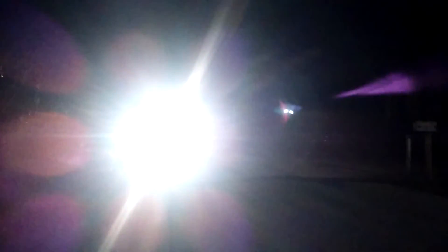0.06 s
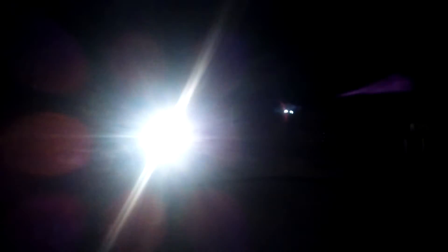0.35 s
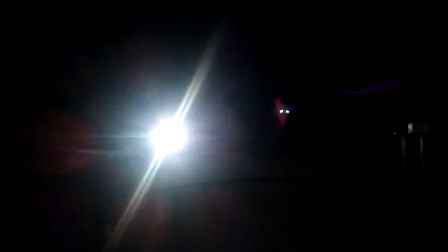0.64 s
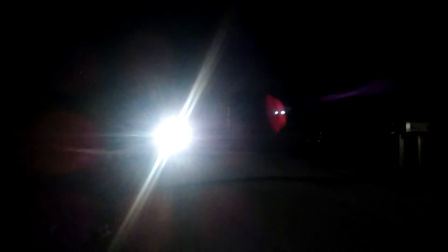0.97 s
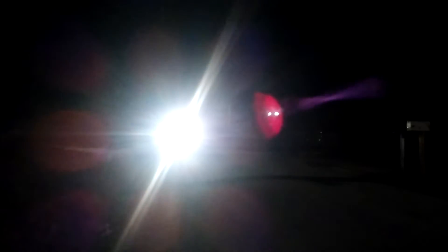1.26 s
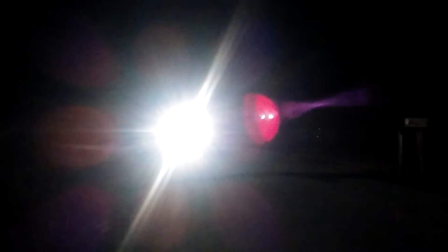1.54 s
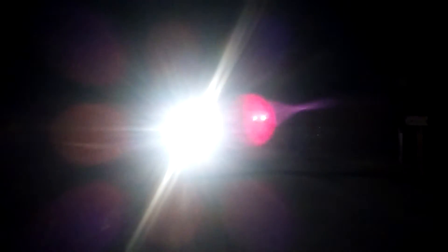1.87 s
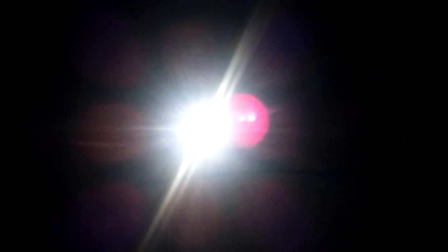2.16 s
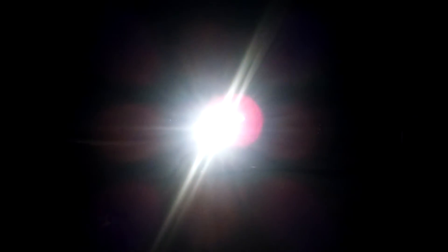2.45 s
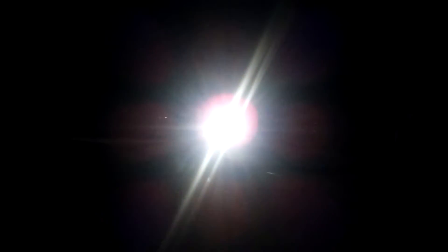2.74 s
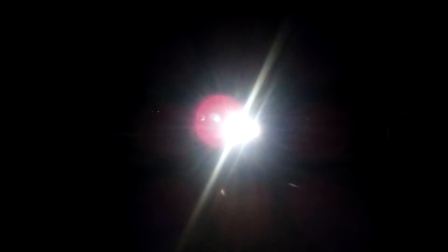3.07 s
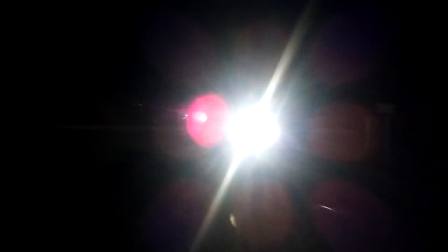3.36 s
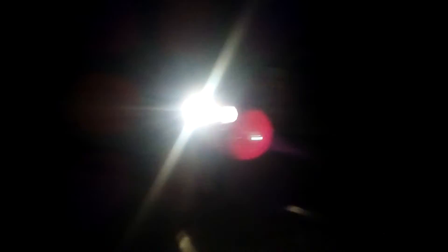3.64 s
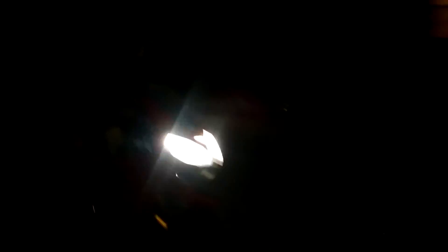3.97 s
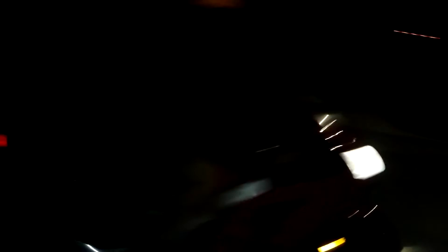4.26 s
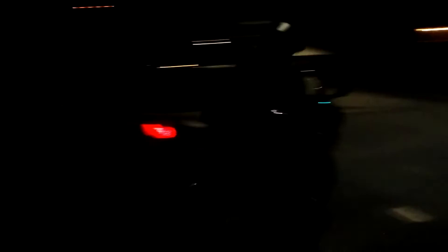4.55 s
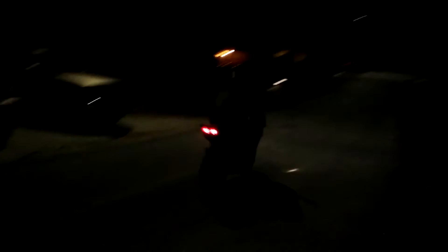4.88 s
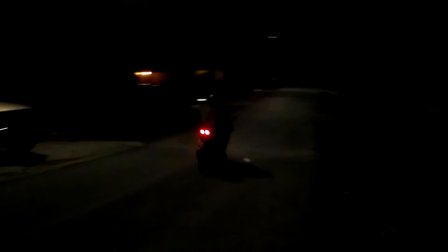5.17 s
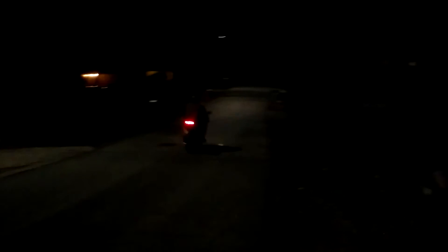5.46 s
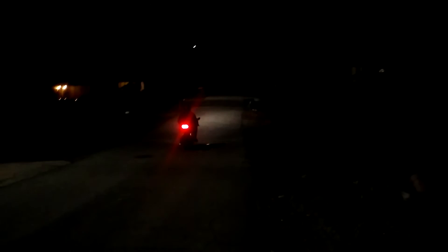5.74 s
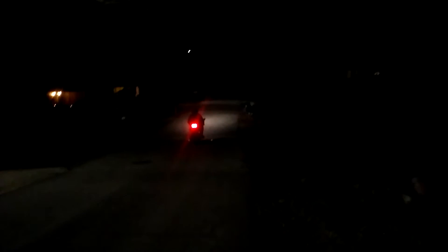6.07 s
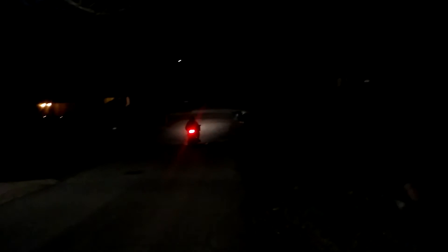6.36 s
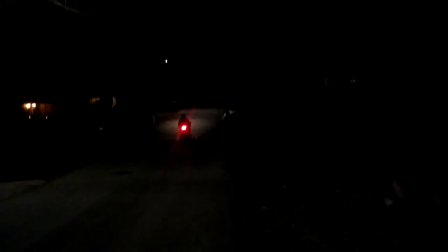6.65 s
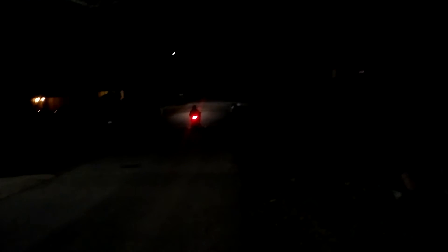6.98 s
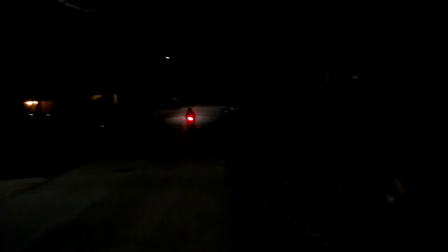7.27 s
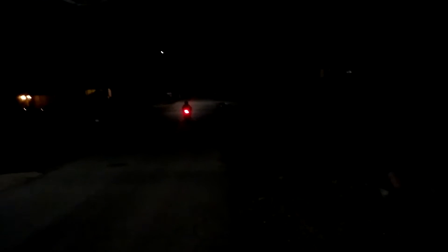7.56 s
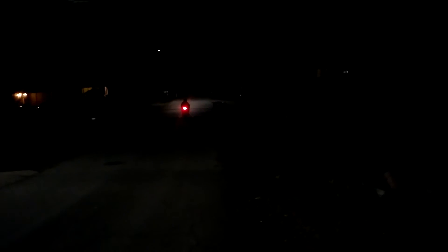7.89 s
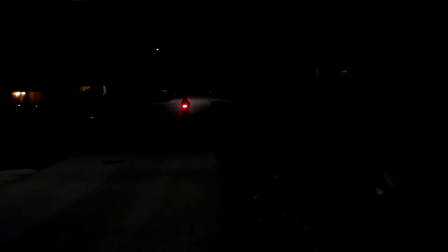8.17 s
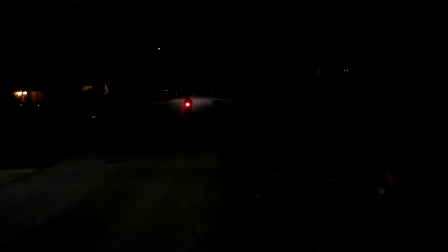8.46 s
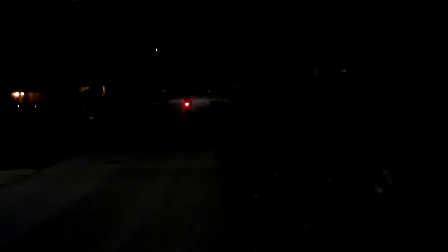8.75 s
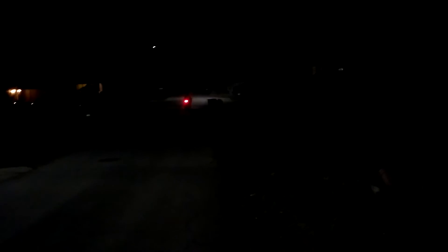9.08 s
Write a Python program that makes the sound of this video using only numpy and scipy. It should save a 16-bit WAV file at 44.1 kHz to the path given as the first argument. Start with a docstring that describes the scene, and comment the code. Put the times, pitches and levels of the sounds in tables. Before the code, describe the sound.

On a hushed night street, a motorcycle drones closer, accelerates loudly past, then eases off and idles far away.

```python
"""A quiet street at night: a motorcycle approaches, opens the throttle, passes close by and drops to a
distant idle. Each firing sends a pressure pulse down the exhaust. At light load the pulses excite the
silencer's resonances as uneven putts; under power they merge into a harmonic drone and a bright bark.
House fronts reflect the sound. Clatter, hiss and the whine of gears and chain swell around the pass,
and a few small clicks and rustles sound nearby."""
import sys
import numpy as np
from scipy import signal
from scipy.fft import rfft, irfft, next_fast_len
from scipy.io import wavfile
from scipy.ndimage import uniform_filter1d

SR = 44100
rng = np.random.default_rng(int(sys.argv[2]) if len(sys.argv) > 2 else 0)


def bounce(signal):
    """Save signal as a 16-bit WAV file at the path given by the first command-line argument."""
    frames = np.transpose(np.atleast_2d(signal))
    limited = np.clip(frames, -1, 1)
    pcm = np.round(limited * 32767).astype(np.int16)
    wavfile.write(sys.argv[1], SR, pcm)


N = 406592
TIME = np.arange(N) / SR
PASS_S, NEAR_SPAN_S = 4.5, 0.48  # the bike is alongside, and counts as near this long either side


def from_db(db):
    """Decibel law: amplitude grows tenfold every 20 dB."""
    return 10 ** (np.asarray(db) / 20)


def rms_one(x):
    """Normalisation to unit mean power."""
    return x / np.sqrt(np.mean(x ** 2) + 1e-20)


def levelled(x, size=6000):
    """Division by the running RMS gives unit local power and keeps the fast beat."""
    return x / np.sqrt(np.abs(uniform_filter1d(uniform_filter1d(x ** 2, size), size)) + 1e-14)


def blend(tone, rough, tone_share):
    """Incoherent addition: the powers of a pitched and a noisy sound sum to a constant."""
    share = np.clip(tone_share, 0, 1)
    return np.sqrt(share) * levelled(tone) + np.sqrt(1 - share) * levelled(rough)


def bump(centre_s, span_s):
    """Gaussian envelope of height 1, down to 1/e at span_s either side."""
    return np.exp(-((TIME - centre_s) / span_s) ** 2)


def in_time(curve):
    """Linear interpolation of a curve at every sample."""
    return np.interp(TIME, *np.transpose(curve))


def at_hz(spectrum, hz):
    """Interpolation of a spectrum's decibels over log frequency."""
    known_hz, db = np.transpose(spectrum)
    return np.interp(np.log(hz), np.log(known_hz), db)


def coloured(x, spectrum):
    """Minimum-phase filtering: folding the cepstrum makes the response causal."""
    size = next_fast_len(N + 8192, real=True)
    hz = np.arange(size // 2 + 1) * SR / size + 1
    cepstrum = irfft(np.log(from_db(at_hz(spectrum, hz))), size)
    cepstrum[1:size // 2] *= 2
    cepstrum[size // 2 + 1:] = 0
    return irfft(rfft(x, size) * np.exp(rfft(cepstrum)), size)[:N]


def band(x, low_hz, high_hz, order=4):
    """Butterworth band-pass filtering."""
    edges = np.clip([low_hz, high_hz], 10, .45 * SR)
    return signal.sosfilt(signal.butter(order, edges, "band", fs=SR, output="sos"), x + 1e-18)


def resonate(x, modes):
    """Modal superposition: one force drives parallel damped resonators."""
    return sum(from_db(db) * signal.lfilter(*signal.iirpeak(hz, hz / width, fs=SR), x)
               for hz, width, db in modes)


def drift(per_s):
    """Random fluctuation: straight lines between Gaussian values."""
    knots = rng.standard_normal(4000)
    return np.interp(TIME * per_s, np.arange(len(knots)), knots)


def noise():
    """White noise: equal power per hertz."""
    return rng.standard_normal(N)


# Spectrum of the street's hush: frequency_hz, gain_db
STREET_SPECTRUM = [(20, -23), (50, -5.5), (120, 6.5), (330, -3), (470, -16), (680, -12.5), (930, -3),
                   (1300, -16), (1700, -23.5), (2800, -15), (3600, -29), (6500, -31), (10000, -40),
                   (15000, -33.5)]

def street(level_db=-62.5):
    """Ambient noise floor: a steady hush, strongest in the bass."""
    return from_db(level_db) * rms_one(coloured(noise(), STREET_SPECTRUM))


# Engine speed as heard: time_s, firing_rate_hz
FIRING_RATE = [(0, 69.5), (.35, 71.2), (.8, 70.9), (1.7, 75.6), (2, 76.2), (2.75, 78.8), (2.88, 84.4),
               (3.05, 72), (3.24, 94.5), (3.35, 89), (3.5, 94.5), (3.64, 103), (4.2, 128.2), (4.27, 135.8),
               (4.38, 163.8), (4.46, 175.5), (4.56, 177.2), (4.7, 190.8), (4.85, 200.2), (4.98, 203.7),
               (5.17, 192.5), (5.24, 164.5), (5.35, 161.4), (5.75, 111.3), (6.03, 90.5), (6.5, 60.4),
               (6.85, 50.6), (9.22, 52.2)]
# Throttle, with a blip and a long pull before it shuts: time_s, load_fraction
ENGINE_LOAD = [(0, 0.34), (2.78, 0), (2.88, 0.15), (3.05, 0.53), (3.22, 0.47), (3.8, 0.55), (4.5, 0.68),
               (5.0, 0.72), (5.15, 0.92), (5.21, 0.11)]

def combustion(rate, load, wobble=0.001, burble_cycles=0.091, limp_db=-0.24,
               idle_hz=51, idle_spread_db=5.0, overrun_spread_db=1.0, least_spread_db=0.9):
    """Cyclic variation: firings even out as the revs rise, and burble early and late on the overrun."""
    overrun = np.exp(-((TIME - 5.75) / 0.57) ** 4)
    cycles = np.cumsum(rate * (1 + wobble * drift(70))) / SR
    stumbling = cycles + burble_cycles * overrun * drift(60)
    firing = np.round(stumbling).astype(int)
    chance = np.clip(rng.standard_normal(2000), -2, 2)
    spread_db = idle_spread_db * (idle_hz / rate) ** 2.8 + overrun_spread_db * overrun + least_spread_db
    imbalance_db = limp_db * (-1) ** firing  # two unequal cylinders add faint half orders
    strength = uniform_filter1d(from_db(spread_db * chance[firing] + imbalance_db), size=100)
    tonal = np.clip(0.16 * (1 - overrun) + 0.79 * load, 0, 1)
    return cycles, stumbling, strength, tonal


# Overall course of the exhaust at the roadside: time_s, level_db
EXHAUST_LEVEL = [(0.0, -36), (0.49, -34.5), (0.96, -35), (1.88, -31.5), (2.42, -31), (2.64, -29.5),
                 (3.13, -26), (3.17, -20), (3.56, -19), (4.37, -8.5), (4.68, -9.5), (4.84, -7), (5.04, -10),
                 (5.32, -20), (5.57, -25.5), (6.13, -44), (6.82, -53.5), (7.7, -54.5)]
# Course of its middle orders, the bark: time_s, level_db
BARK_LEVEL = [(0, -47), (1, -45), (2.7, -44), (3.1, -40), (3.3, -36.5), (3.7, -32), (4.05, -25),
              (4.35, -17.5), (4.75, -15.5), (5.1, -25), (5.22, -35.5), (5.8, -45), (6.35, -47.5),
              (6.75, -54), (7, -62), (7.8, -63.5), (8.2, -69.5), (9.22, -69)]
# Runs of stronger firings with the throttle shut: centre_s, lift_db
SPUTTER_RUNS = [(5.58, 0), (5.87, -2), (6.17, 3), (6.34, 4), (7.2, 3), (7.84, 1), (8.02, 5), (8.18, 10.5),
                (8.32, 8.5), (8.611, 4.5), (8.78, 1), (8.93, 4), (9.09, 5.5)]

def exhaust_gains(rate, load, sputter_span_s=0.029, idle_hz=51):
    """Source balance: revs and load favour drone over putts; sputters lift both, and the bark less."""
    lift_db = sum(db * bump(s, sputter_span_s) for s, db in SPUTTER_RUNS)
    exhaust_db = in_time(EXHAUST_LEVEL) + lift_db
    drone_db = exhaust_db - 2 + 2 * load
    putt_db = exhaust_db - 1 - 15 * load ** 2 - 3 * np.log2(rate / idle_hz)
    bark_db = in_time(BARK_LEVEL) + lift_db / 2 - 0.5
    return from_db(drone_db), from_db(putt_db), from_db(bark_db)


# Spectral envelopes of the exhaust coming, alongside and going: frequency_hz, gain_db
EXHAUST_COMING = [(70, -7.5), (85, -10), (110, -2), (140, -4.5), (175, -12), (230, -7.5), (285, -6),
                  (340, -9.5), (385, -8), (440, -24.5), (520, -13.5)]
EXHAUST_NEAR = [(135, -2), (175, -5), (197, 1), (240, 0.5), (288, -23), (320, -3), (352, 2), (390, -8),
                (430, -0.5), (500, -4), (560, -13), (605, -30), (740, -10.5), (810, -11)]
EXHAUST_GOING = [(50, -17), (75, -7), (103, -2), (130, -2), (165, -10.5), (205, -4), (240, -11),
                 (280, -3.5), (330, -3.5), (400, -12.5), (600, -29.5)]
# Swells and fades of single harmonics: centre_s, span_s, harmonic_number, gain_db
HARMONIC_SWELLS = [(.1, 0.12, 2, -9), (.55, 0.3, 3, 4), (1.852, 0.33, 1, -21), (1.9, 0.28, 2, 7),
                   (2.357, 0.11, 3, -12), (2.7, 0.33, 1, 3), (5.62, .08, 1, 4), (5.753, .15, 2, -2),
                   (5.884, .06, 1, 11), (6.3, .35, 1, -4.5), (6.35, .35, 2, -10), (6.043, 0.088, 4, 8),
                   (4.335, 0.029, 2, 2), (4.603, 0.093, 4, 4.5), (7.0, .35, 1, 11), (5.137, 0.054, 2, 7.5)]

def drone(cycles, strength, rate, near_from_s=4.2, near_until_s=5.17, fade_s=0.15, waver_db=2.5):
    """Harmonic series: four orders of the firing rate glide through the exhaust's peaks and dips."""
    near = np.clip(np.minimum(TIME - near_from_s, near_until_s - TIME) / fade_s + .5, 0, 1)
    far = 1 - bump(PASS_S, 2 * NEAR_SPAN_S)
    out = 0
    for k in range(1, 5):
        hz = k * rate
        far_db = np.where(TIME < PASS_S, at_hz(EXHAUST_COMING, hz), at_hz(EXHAUST_GOING, hz))
        colour_db = near * at_hz(EXHAUST_NEAR, hz) + (1 - near) * far_db
        swell_db = sum(db * bump(s, span) for s, span, order, db in HARMONIC_SWELLS if round(order) == k)
        gain = from_db(colour_db + swell_db + waver_db * far * drift(9))
        flutter = levelled(strength ** (k / 3))
        lag_rad = 0.31 * (hz / 105) ** 1.5  # dispersion: the pipe delays higher frequencies more
        out = out + gain * flutter * np.cos(2 * np.pi * k * cycles - lag_rad)
    return band(np.sqrt(2) * out, 42, 2000)


def wall_echo(x, echo_db=-6, span_s=2.2, shortest_m=4.34, nearest_s=4.4, growth_m_per_s=2.65):
    """Interference: a reflection's path changes as the bike moves, so each harmonic swells and fades."""
    extra_path_m = shortest_m + growth_m_per_s * np.abs(TIME - nearest_s)
    reflection = np.interp(TIME - extra_path_m / 343, TIME, x)
    gain = from_db(echo_db) * (1 - bump(PASS_S, span_s))  # the direct sound swamps it close by
    return (x + gain * reflection) / np.sqrt(1 + gain ** 2)


def pulses(cycles, strength):
    """Impulse train: one pulse per firing, shared between two neighbouring samples."""
    at = np.flatnonzero(np.diff(np.floor(cycles)) > 0)
    late = (np.ceil(cycles[at]) - cycles[at]) / (cycles[at + 1] - cycles[at])
    out = np.zeros(N)
    out[at], out[at + 1] = strength[at] * (1 - late), strength[at] * late
    return out


# Resonances of the silencer: pitch_hz, bandwidth_hz, gain_db
SILENCER_MODES = [(119, 43, 0.5), (247, 90, 4), (354, 86, -8.5)]

def putts(firings, cycles, tonal, turbulence=0.67, puff_depth=0.99):
    """Forced resonance: each pulse and its puff of turbulent gas thump the silencer's broad modes."""
    puffs = noise() * (1 + puff_depth * np.cos(2 * np.pi * cycles))
    puff_share = np.clip(turbulence * (1 - tonal), 0, 1)
    gas = np.sqrt(1 - puff_share) * levelled(firings) + np.sqrt(puff_share) * rms_one(puffs)
    thumps = band(resonate(gas, SILENCER_MODES), 75, 410, order=7)
    return levelled(street_scatter(thumps))


def street_scatter(x, riding_db=-1, idle_db=-13, decay_s=0.22, size=16000):
    """Diffuse reflection: walls, fences and parked cars return a short tail of echoes."""
    echo_db = np.interp(TIME, [6.3, 7.5], [riding_db, idle_db])
    tail = rng.standard_normal(size) * np.exp(-np.arange(size) / SR / decay_s)
    return x + from_db(echo_db) * signal.fftconvolve(x, tail / np.linalg.norm(tail))[:N]


# Spectra of the bike's noise coming, alongside and going: frequency_hz, gain_db
NOISE_COMING = [(400, -1), (580, -5), (740, 0.5), (900, -4), (1400, -7.5), (1750, -4.5), (2300, -6.5),
                (3100, -9), (3800, -20), (4700, -20.5), (6800, -20.5), (8500, -29.5), (11000, -32.5),
                (15000, -39)]
NOISE_NEAR = [(400, -2.5), (700, 2), (1000, 8.5), (1300, -3), (1900, 0), (2500, -2.5), (3300, -7.5),
              (4500, -13.5), (6600, -12), (8000, -19.5), (10000, -24), (12500, -28), (15500, -32.5)]
NOISE_GOING = [(400, -1), (490, -8.5), (660, 6), (900, -1), (1300, -13), (1650, -4.5), (2800, -8.5),
               (3500, -19), (4400, -19.5), (5300, -21.5), (6200, -14), (8300, -27), (10500, -31),
               (15000, -44)]

def rush(cycles, strength, throb=0.024, near_s=4.533, span_s=1.0, grain_db=1.6):
    """Directivity: the noise of gas, valve gear, chain and tyres changes colour as the bike goes by."""
    near = bump(near_s, span_s)
    views = [(NOISE_COMING, (1 - near) * (TIME < near_s)),
             (NOISE_NEAR, near),
             (NOISE_GOING, (1 - near) * (TIME >= near_s))]
    sound = sum(np.sqrt(share) * rms_one(coloured(noise(), spectrum)) for spectrum, share in views)
    beat = 1 + throb * np.cos(2 * np.pi * cycles) * np.sqrt(strength)
    return sound * beat * from_db(grain_db * drift(300))


# Spectral envelope of the exhaust's bark: frequency_hz, gain_db
BARK_SPECTRUM = [(400, -20.5), (500, -13), (600, -8.5), (760, -2), (1000, 4), (1400, -1), (1750, -16.5),
                 (2400, -18), (4000, -26.5), (8000, -49)]

def bark(firings, rushing, rate, tonal, knee_hz=880, full_rate_hz=170):
    """Wave steepening: pulses sharpen with the revs, so the middle orders grow brighter."""
    harmonics = band(coloured(firings, BARK_SPECTRUM), 560, 5000)
    sound = blend(harmonics, band(rushing, 480, 1400), tonal)
    steepness = np.clip(rate / full_rate_hz, .5, 1.2)
    return levelled(band(sound, 230, knee_hz, order=2) + steepness * band(sound, knee_hz, 5100, order=1))


# Course of the engine's mechanical noise at the roadside: time_s, level_db
MACHINERY_LEVEL = [(0, -55.5), (1.3, -51), (2.7, -44), (2.88, -39), (3.08, -40.5), (3.25, -34),
                   (3.55, -32.5), (4.3, -21.5), (4.75, -22), (5.15, -25), (5.25, -29.5), (5.9, -41.5),
                   (6.35, -48.5), (6.85, -57.5), (7.6, -60.5), (8.1, -68.5), (9.22, -73.5)]

def machinery(firings, rushing, tonal, snarl=0.42):
    """Broadband radiation: clatter and hiss follow one level, and the treble opens up close by."""
    clatter = blend(band(firings, 1350, 1956), band(rushing, 1313, 3950), snarl * tonal ** 3)
    hiss = levelled(band(casing(rushing), 4040, 9000))
    treble = levelled(band(rushing, 9000, 17000))
    behind = np.clip((TIME - PASS_S) / NEAR_SPAN_S, 0, 1)
    hiss_db = -8 + 3.5 * bump(4.56, .9) - 1.5 * behind
    treble_db = -22 + 7 * bump(4.38, 0.24)
    sound = from_db(-1.16) * clatter + from_db(hiss_db) * hiss + from_db(treble_db) * treble
    return from_db(in_time(MACHINERY_LEVEL)) * sound


# Resonances of the engine casings and chain guard: pitch_hz, bandwidth_hz, gain_db
CASING_MODES = [(4540, 730, 0), (5700, 500, -17.5)]

def casing(x, behind_s=4.7, fade_s=0.4):
    """Panel resonance: metal covers colour the noise once the bike shows its side and back."""
    exposed = np.clip((TIME - behind_s) / fade_s + .5, 0, 1)
    return x + exposed * resonate(x, CASING_MODES)


# Soft rustles nearby: centre_s, span_s, level_db
RUSTLE_SWELLS = [(0.941, .03, -55), (2.227, 0.017, -49), (6.654, .06, -61), (6.937, .04, -61),
                 (7.23, .04, -66), (7.62, .025, -59), (7.75, 0.027, -68), (7.868, .02, -65),
                 (8.873, .025, -70)]

def rustles(grain_db=5):
    """Random amplitude modulation makes brief swells of hiss grainy."""
    envelope = sum(from_db(db) * bump(s, span) for s, span, db in RUSTLE_SWELLS)
    return envelope * rms_one(band(noise(), 5400, 8300, order=2) * from_db(grain_db * drift(200)))


# Tones of the gears: firing_rate_multiple, centre_s, span_s, level_db, linewidth_hz
GEAR_TONES = [(22.5, 2.15, .75, -48.5, 220), (62, 2.15, .3, -59, 150), (25, 2.87, .05, -42, 1100),
              (44, 2.95, .08, -50, 130), (44, 3.38, .15, -43.5, 170), (22.1, 3.7, .3, -41, 130),
              (44.5, 3.66, .17, -42.5, 330), (29.5, 4.17, .09, -33.5, 55), (22, 4.44, .11, -32.5, 90),
              (22.1, 4.9, .25, -33, 170), (15, 5.09, .11, -35, 90)]

def gear_whine(cycles):
    """Tooth meshing: gears sing at fixed multiples of the engine speed; backlash broadens the lines."""
    out = 0
    for multiple, s, span, db, width in GEAR_TONES:
        phase = 2 * np.pi * multiple * cycles
        tone = drift(width) * np.cos(phase) + drift(width) * np.sin(phase)
        out = out + from_db(db) * bump(s, span) * rms_one(tone)
    return out


# Small contacts nearby: start_s, peak_db, centre_hz, width_octaves
CONTACTS = [(3.187, -19, 2100, 0.7), (3.697, -9, 4600, 1.2), (4.499, -7, 1780, 0.42),
            (5.5047, -7, 2210, 1.36), (5.9768, -25.5, 2130, 0.51), (6.122, -28, 2140, 0.61),
            (6.33, -29, 1500, 2), (6.465, -26.5, 2420, 0.38), (6.615, -26.5, 1210, 1.6),
            (6.619, -34.5, 696, 0.48), (7.563, -35, 3060, 0.51), (7.7422, -29, 2020, 0.51),
            (7.7446, -35, 1860, 0.35), (7.7606, -46, 2250, 0.4), (7.859, -46, 6500, 0.54)]

def clicks(crack_s=0.0006, tail_db=-19, tail_s=0.033, size=12000):
    """Impact transients: hard little contacts, each with a short scattered echo from the street."""
    out, age = np.zeros(N + size), np.arange(size) / SR
    envelope = np.exp(-age / crack_s) + from_db(tail_db) * np.exp(-age / tail_s)
    for s, db, hz, octaves in CONTACTS:
        start, edge_ratio = round(s * SR), 2 ** (octaves / 2)
        click = band(rng.standard_normal(size) * envelope, hz / edge_ratio, hz * edge_ratio, order=3)
        out[start:start + size] += from_db(db) * click / np.abs(click).max()
    return out[:N]


def slipstream(level_db=-34, centre_s=4.55, span_s=0.067):
    """Turbulence: a low gust while the machine is alongside."""
    return from_db(level_db) * bump(centre_s, span_s) * rms_one(band(noise(), 130, 650, order=2))


# The drive chain's whine, climbing with road speed: time_s, pitch_hz
CHAIN_PITCH = [(4.6, 1500), (4.8, 1634), (4.95, 1740), (5.15, 1756)]

def chain_whine(level_db=-26, centre_s=4.9, span_s=.19, blur_hz=60, jitter_rad=0.45):
    """Phase modulation roughens the chain's tone, heard just after the rear wheel has gone by."""
    phase = 2 * np.pi * np.cumsum(in_time(CHAIN_PITCH)) / SR
    tone = np.cos(phase + jitter_rad * drift(blur_hz))
    return from_db(level_db) * bump(centre_s, span_s) * rms_one(tone)


def grit(per_s=28, level_db=-57, spread_db=4, decay_s=0.00077, low_hz=5600, high_hz=8200):
    """A Poisson process: fine gritty ticks at random instants, heard once the engine has gone by."""
    sizes = from_db(spread_db * np.minimum(rng.exponential(1, N), 3))
    impulses = sizes * (rng.random(N) < per_s / SR)
    envelope = signal.lfilter([1], [1, -np.exp(-1 / (decay_s * SR))], impulses + 1e-18)
    ticks = band(noise() * envelope, low_hz, high_hz, order=2) * np.sqrt(SR / (high_hz - low_hz))
    return from_db(level_db) * bump(centre_s=6.0, span_s=1.6) * ticks


def motorcycle():
    """Common excitation: one firing cycle drives exhaust, machinery and gears; the chain adds its tone."""
    rate = in_time(FIRING_RATE)
    load = np.clip(in_time(ENGINE_LOAD), 0, 1)
    cycles, stumbling, strength, tonal = combustion(rate, load)
    firings, rushing = pulses(stumbling, strength), rush(cycles, strength)
    drone_gain, putt_gain, bark_gain = exhaust_gains(rate, load)
    exhaust = (drone_gain * wall_echo(drone(stumbling, strength, rate))
               + putt_gain * putts(firings, stumbling, tonal)
               + bark_gain * bark(firings, rushing, rate, tonal))
    return exhaust + machinery(firings, rushing, tonal) + gear_whine(cycles) + chain_whine()


def scene():
    """Superposition: the motorcycle and the small sounds add to the street's hush in one channel."""
    return (street() + motorcycle() + slipstream() + clicks() + rustles() + grit())[None]


def record(dry, cutoff_hz=15700):
    """Soft saturation rounds the loudest peaks, and a low-pass filter cuts the highest treble."""
    rounded = dry / (1 + np.abs(dry) ** 6) ** (1 / 6)
    return signal.sosfilt(signal.ellip(12, .1, 80, cutoff_hz, fs=SR, output="sos"), rounded)


dry = scene()
out = record(dry)
bounce(out)
```